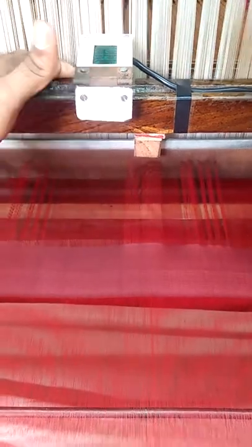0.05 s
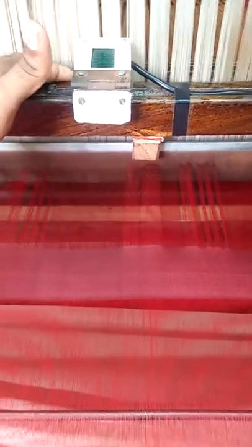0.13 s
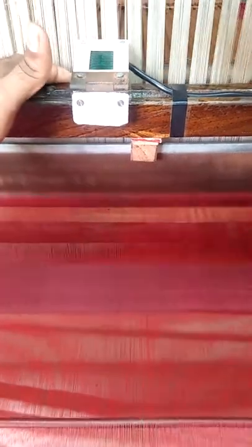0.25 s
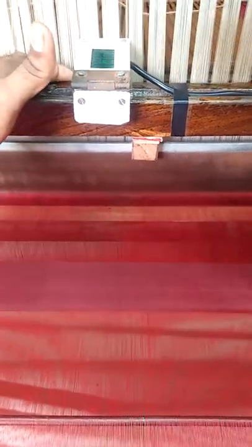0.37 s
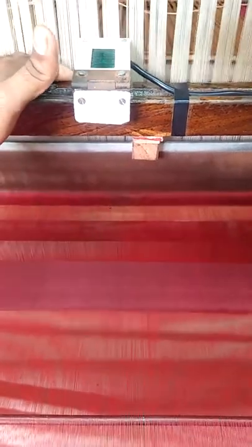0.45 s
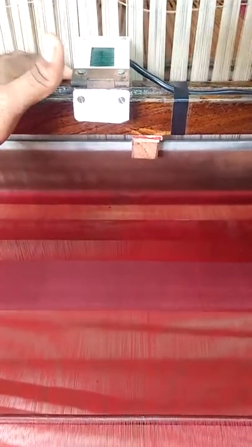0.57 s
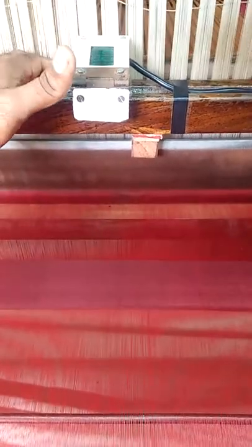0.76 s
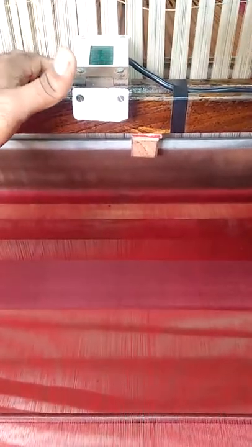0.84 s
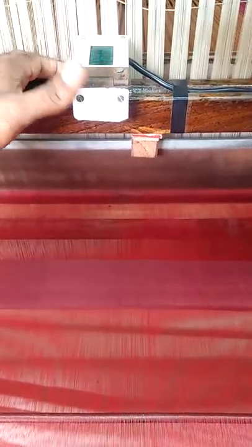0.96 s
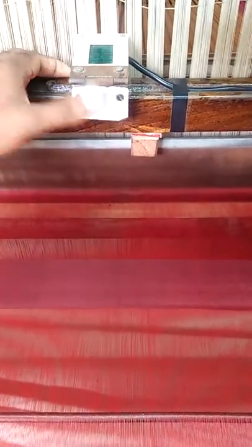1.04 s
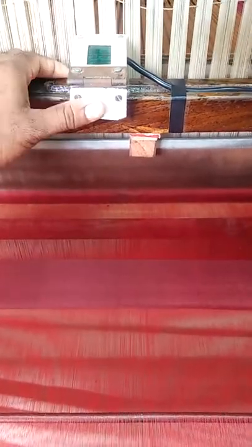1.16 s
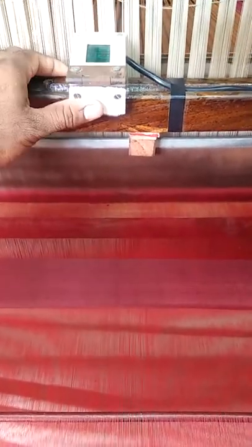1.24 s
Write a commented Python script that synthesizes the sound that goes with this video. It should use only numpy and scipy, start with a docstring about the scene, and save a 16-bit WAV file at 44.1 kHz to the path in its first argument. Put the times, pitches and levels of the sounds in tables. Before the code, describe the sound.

A handloom clatters close by in a quiet room. It opens with a dry wooden knock and a brief groan around 0.2 seconds. Rods, cords and metal heddles rush into a bright, jingling crash at 0.4 seconds, surging again at 0.5 over a low wooden hum. From 0.8 seconds, as this fades, light clicks set metal ringing faintly, with one crisp switch snap near 1.2 seconds.

```python
"""In a quiet room, close to a handloom as it changes shed. A wooden knock and a short groan of the
frame lead into a rush of tiny contacts as cords, rods and metal heddles shift, crash together and
settle. The wooden frame hums and sways, and a few light clicks, as a hand works the switch, set the
metal parts ringing. Rattles are dense trains of impacts coloured by wood or metal; rings are
decaying modes."""
import sys
import numpy as np
from scipy import signal
from scipy.fft import rfft, irfft
from scipy.io import wavfile
from scipy.ndimage import uniform_filter1d

SR = 44100
rng = np.random.default_rng(int(sys.argv[2]) if len(sys.argv) > 2 else 0)


def transcribe(u):
    """Save the signal u as a 16-bit wav file named by the first command-line argument.

    u: samples, shape (n,) or (channels, n), limited to [-1, 1]; the rate is SR.
    q: integer samples, one column per channel.
    """
    v = np.clip(np.atleast_2d(u).T, -1, 1)
    q = np.round(v * 32767).astype(np.int16)
    wavfile.write(sys.argv[1], SR, q)


N = 57330
T = np.arange(N) / SR


def amp(db):
    """Decibels to gain."""
    return 10 ** (np.asarray(db) / 20)


def unit_rms(x):
    """Scales to an rms of one."""
    return x / np.sqrt(np.mean(x ** 2) + 1e-20)


def fader(points):
    """A gain ride through (time [s], level [dB]) points."""
    return amp(np.interp(T, *np.transpose(points)))


def eq(x, curve):
    """Filters by a curve of (frequency [Hz], gain [dB]) points."""
    hz, db = np.transpose(curve)
    bins = np.fft.rfftfreq(2 * N, 1 / SR)
    gain = amp(np.interp(np.log(bins + 1), np.log(hz), db))
    return irfft(rfft(x, 2 * N) * gain)[:N]


def noise(curve):
    """Steady coloured noise."""
    return unit_rms(eq(rng.standard_normal(N), curve))


def wander(samples):
    """Random drift: noise under a moving average."""
    return unit_rms(uniform_filter1d(rng.standard_normal(N), size=samples))


def blow(start, rise, t60):
    """Envelope of a hit: straight attack, exponential decay."""
    age = np.maximum(T - start, 0)
    return np.minimum(age / rise, 1) * amp(-60 * np.maximum(age - rise, 0) / t60)


def swell(start, length):
    """Envelope of a slip: a single arch."""
    return np.sin(np.pi * np.clip((T - start) / length, 0, 1))


def contacts(per_s, spread_db):
    """A dense train of tiny impacts of uneven size."""
    size = amp(spread_db * np.minimum(rng.exponential(1, N), 3))
    return unit_rms(size * rng.choice([-1, 1], N) * (rng.random(N) < per_s / SR))


def rattle(curve, per_s, spread_db):
    """Impacts coloured by the material they strike."""
    return unit_rms(eq(contacts(per_s, spread_db), curve))


def jingle(curve, wires, per_s, spread_db, t60=0.06, share=0.55):
    """Impacts on thin wires, each with its own pitch; share is the ringing part of the power."""
    hits = contacts(per_s, spread_db)
    pitches = 2400 + 12000 * (np.arange(wires) + rng.random(wires)) / wires
    age = T[:N // 3]
    tones = np.sin(2 * np.pi * (pitches[:, None] * age + rng.random((wires, 1))))
    ping = tones.sum(0) * amp(-60 * age / t60)
    ringing = unit_rms(irfft(rfft(hits) * rfft(ping, N), N))
    return unit_rms(eq(np.sqrt(1 - share) * hits + np.sqrt(share) * ringing, curve))


def ring(drive, hz, t60):
    """One resonance, as strong as the signal that drives it."""
    mode = np.sin(2 * np.pi * hz * T) * amp(-60 * T / t60)
    return unit_rms(signal.fftconvolve(drive, mode)[:N]) * np.std(drive)


def strike(start, rise, modes):
    """Modes set ringing by a single blow."""
    return sum(amp(db) * blow(start, rise, t60) * np.sin(2 * np.pi * (hz * T + rng.random()))
               for hz, db, t60 in modes)


# dark room tone (frequency [Hz], gain [dB])
ROOM_EQ = [(30, 3), (600, -5), (2000, -3), (5000, -25), (14000, -44)]

def room_tone():
    """A faint, steady bed of noise."""
    return amp(-77) * noise(ROOM_EQ)


# surges of the swaying loom (time [s], level [dB])
SWAY_RIDE = [(0, -94), (.2, -63), (.45, -51.5), (.55, -62), (.66, -44.5), (.8, -55), (.97, -54),
             (1.1, -62.5), (1.3, -68)]
# their sub-bass weight (frequency [Hz], gain [dB])
SWAY_EQ = [(22, -50), (36, -15), (47, -4), (60, -7), (80, -12.5), (200, -50)]

def sway():
    """The whole loom rocks with a very low rumble."""
    return fader(SWAY_RIDE) * noise(SWAY_EQ)


# travel of the shafts (time [s], level [dB])
SHAFT_RIDE = [(0.02, -74.5), (0.09, -54.5), (0.22, -49), (0.39, -40.5), (0.66, -47.5), (0.76, -59.5),
              (1.0, -67.5), (1.3, -61.5)]
# their dull body (frequency [Hz], gain [dB])
SHAFT_EQ = [(50, -19), (95, -1), (250, -9), (305, 6.5), (370, -12.5), (445, 0.5), (515, -8), (620, 7.5),
            (900, -1), (3000, -57)]

def shafts():
    """The moving shafts rumble with muffled contacts."""
    return fader(SHAFT_RIDE) * rattle(SHAFT_EQ, per_s=3000, spread_db=3.0)


# hard, woody attack (frequency [Hz], gain [dB])
KNOCK_EQ = [(100, -47), (700, -11.5), (1050, 4), (1400, -3), (2100, 3), (2600, -6.5), (5700, -13),
            (6700, -18), (7600, -13), (9800, -16.5), (11500, -25)]
# ring of the knocked wood (frequency [Hz], level [dB], t60 [s])
WOOD_MODES = [(1040, -43, 0.27), (2000, -35, 0.028)]

def knock(start=0.0252):
    """A dry wooden knock with a short diffuse tail."""
    attack = amp(-43) * blow(start, rise=0.0014, t60=0.019)
    tail = amp(-39) * blow(start, rise=0.0017, t60=0.24)
    grain = rattle(KNOCK_EQ, per_s=13000, spread_db=3.5)
    return (attack + tail) * grain + strike(start, rise=0.0017, modes=WOOD_MODES)


# shifting of the wooden rods and cords (time [s], level [dB])
ROD_RIDE = [(0.03, -81), (0.1, -56.5), (0.15, -50.5), (0.24, -50.5), (0.28, -41), (0.35, -41), (0.41, -32),
            (0.49, -33.5), (0.53, -35.5), (0.66, -38), (0.82, -47.5), (0.86, -48.5), (1.0, -59.5),
            (1.3, -54)]
# their midrange clatter (frequency [Hz], gain [dB])
ROD_EQ = [(250, -23.5), (520, -28), (680, -9.5), (900, 2.5), (2100, 2.5), (2700, -8.5), (4000, -7),
          (5000, -9.5), (14000, -20)]

def rods():
    """Rods and cords shift in a rush of small contacts."""
    return fader(ROD_RIDE) * rattle(ROD_EQ, per_s=4000, spread_db=1.0)


# ring of the metal fittings, low to high (frequency [Hz], gain [dB])
METAL_MODES = [(1346, -6), (1561, -5), (1625, -1), (1658, 0), (1914, 0), (1995, -1), (2134, -3), (2239, -7),
               (2870, -8), (3682, -4), (4807, -10), (5416, -9), (6562, -7), (7260, -6), (7940, -4),
               (8565, -3), (9087, -7), (9830, -6), (10665, -2), (12370, -5), (12898, -8), (14130, -8)]

def fittings(friction):
    """The moving rods shake the ten lowest modes of the fittings."""
    shake = amp(-13) * fader(ROD_RIDE) * friction
    return sum(amp(db) * ring(shake, hz, t60=0.27) for hz, db in METAL_MODES[:10])


# build and fall of the heddles' jingle (time [s], level [dB])
HEDDLE_RIDE = [(0.03, -88), (0.1, -59.5), (0.135, -54.5), (0.22, -53.5), (0.3, -48.5), (0.36, -43),
               (0.41, -31), (0.505, -37.5), (0.53, -28.5), (0.59, -31.5), (0.69, -34), (0.81, -46),
               (0.92, -60.5), (1.3, -54)]
# its bright top end (frequency [Hz], gain [dB])
HEDDLE_EQ = [(800, -29), (3000, -6), (4200, -11.5), (5200, -7.5), (6500, -0.5), (7800, 8), (9300, -1.5),
             (10800, -2), (12000, -8.5), (14200, -6.5)]

def heddles():
    """Thin metal heddles jostle and jingle."""
    return fader(HEDDLE_RIDE) * jingle(HEDDLE_EQ, wires=70, per_s=2500, spread_db=7.5)


# high resonances of the heddles (frequency [Hz], gain [dB])
SHIMMER_MODES = [(5962, -16), (7690, -13), (8560, -16), (9263, -16), (14100, -18)]

def heddle_shimmer(friction):
    """Rubbing excites short resonances that ride on the jingle."""
    drive = fader(HEDDLE_RIDE) * friction
    return sum(amp(db) * ring(drive, hz, t60=0.023) for hz, db in SHIMMER_MODES)


def cord_scrape(friction):
    """A cord scrapes briefly through one damped resonance."""
    return ring(amp(-55.5) * swell(start=0.098, length=0.091) * friction, hz=4350, t60=0.0092)


# bumps of the frame (time [s], level [dB])
FRAME_BUMPS = [(0.118, -50), (0.379, -40), (0.568, -37.5), (0.663, -49), (1.037, -47), (1.159, -54)]
# its body resonances (frequency [Hz], gain [dB], t60 [s])
HUM_MODES = [(303, -2, 0.47), (461.3, -6.5, 0.28), (610, -8, 0.46)]

def frame_hum(roughness=0.34):
    """The wooden frame hums after each bump, each mode wavering by itself."""
    hum = np.zeros(N)
    for hz, mode_db, t60 in HUM_MODES:
        envelope = sum(amp(db + mode_db) * blow(start, rise=0.017, t60=t60) for start, db in FRAME_BUMPS)
        phase = 2 * np.pi * hz * T + roughness * wander(samples=500)
        flutter = 1 + roughness * wander(samples=350)
        hum += envelope * flutter * np.sin(phase)
    return hum


# slips of the joints (time [s], length [s], pitch [Hz], level [dB])
JOINT_SLIPS = [(0.169, 0.066, 462.5, -47), (0.207, 0.024, 605, -34), (0.229, 0.032, 648, -29.5),
               (0.25, 0.069, 646, -36.5), (0.646, 0.016, 4170, -35)]

def groans(wobble=0.0224):
    """Joints slip in short, unsteady tones: low groans and one thin squeak."""
    out = np.zeros(N)
    for start, length, hz, db in JOINT_SLIPS:
        pitch = hz * (1 + wobble * wander(samples=300))
        out += amp(db) * swell(start, length) * np.sin(2 * np.pi * np.cumsum(pitch) / SR)
    return out


# clear ring of one rod (frequency [Hz], level [dB], t60 [s])
ROD_MODES = [(1658, -42, 0.45), (2239, -39, 0.36), (3844, -44.5, 0.3), (4247, -53, 0.3)]

def rod_clink():
    """One rod is struck and rings as the lift begins."""
    return strike(start=0.247, rise=0.0065, modes=ROD_MODES)


# rod-on-rod accents (time [s], level [dB], pitch [Hz])
ROD_HITS = [(0.397, -29.5, 2060), (0.519, -31, 2020), (0.841, -46.5, 1110)]

def rod_knocks(friction):
    """Rods knock together: bursts of contacts, each through a damped resonance."""
    return sum(ring(amp(db) * blow(start, rise=0.0019, t60=0.081) * friction, hz, t60=0.0092)
               for start, db, hz in ROD_HITS)


# full-range crash of rods and heddles (frequency [Hz], gain [dB])
CRASH_EQ = [(200, -13), (600, -2), (1400, 4.5), (2300, 5), (2700, 0.5), (4700, -5), (6000, -1), (7600, 2.5),
            (10000, 0.5), (14200, -4)]
# thinner, brighter rebound (frequency [Hz], gain [dB])
REBOUND_EQ = [(1200, -4), (2050, 7), (3000, -23), (6500, -12), (7700, 0.5), (9500, -0.5), (14000, 0)]

def crash():
    """Rods and heddles collide at the end of the lift, and the heddles rebound in a second surge."""
    impact = jingle(CRASH_EQ, wires=40, per_s=3000, spread_db=2.0)
    impact *= amp(-20) * blow(start=0.417, rise=0.013, t60=0.47)
    rebound = jingle(REBOUND_EQ, wires=40, per_s=3000, spread_db=2.0)
    rebound *= amp(-25) * blow(start=0.497, rise=0.04, t60=0.47)
    return impact + rebound


# slides of the heddles (time [s], length [s], level [dB])
HEDDLE_SLIDES = [(0.506, 0.021, -33.5), (0.566, 0.062, -29.5)]

def heddle_sing(friction):
    """Sliding heddles sing briefly on one high note."""
    return sum(ring(amp(db) * swell(start, length) * friction, hz=7872, t60=0.09)
               for start, length, db in HEDDLE_SLIDES)


# light clicks (time [s], rattle level [dB], ring level [dB], ring tilt [dB/octave])
CLICK_CUES = [(0.836, -42, -48, 1.5), (0.93, -43, -58.5, -1.5), (1.0116, -48, -50.5, 3),
              (1.044, -48.5, -55, -3), (1.087, -48.5, -60, 2), (1.179, -48.5, -50, 3),
              (1.208, -46, -53.5, -0.5), (1.269, -67, -52.5, 2)]
# metallic edge of their rattle (frequency [Hz], gain [dB])
CLICK_EQ = [(1000, -15.5), (1900, 12), (2600, -5.5), (4500, -8.5), (6200, -2.5), (7700, 3.5), (9300, -1),
            (11200, -7.5), (14200, -9)]

def clicks():
    """Each click is a dying jingle and the ring of the fittings, whose high modes speak and fade first."""
    envelope = sum(amp(db) * blow(start, rise=0.00061, t60=0.35) for start, db, _, _ in CLICK_CUES)
    out = envelope * jingle(CLICK_EQ, wires=48, per_s=5500, spread_db=0.5, t60=0.22, share=0.7)
    for start, _, ring_db, tilt in CLICK_CUES:
        for hz, db in METAL_MODES:
            mode_db = ring_db + db + tilt * np.log2(hz / 4000) + 2 * rng.standard_normal()
            rise = 0.0065 * 2000 / hz
            t60 = 0.27 * (3000 / hz) ** 0.25
            out += strike(start, rise, [(hz, mode_db, t60)])
    return out


# crisp tick of the switch (frequency [Hz], gain [dB])
SNAP_EQ = [(2000, -35), (7600, -5), (8700, 20), (10000, -28), (12500, -13), (14200, -1)]

def switch_snap():
    """The switch snaps once in a sharp burst of treble."""
    return amp(-32) * blow(start=1.1773, rise=0.00061, t60=0.029) * noise(SNAP_EQ)


def shed_change():
    """The moving parts together; one train of contacts drives all the rubbed resonances."""
    clatter = rods() + shafts() + heddles()
    friction = contacts(per_s=2600, spread_db=0.5)
    metal = fittings(friction) + heddle_shimmer(friction) + heddle_sing(friction)
    accents = cord_scrape(friction) + rod_knocks(friction) + crash() + rod_clink()
    return clatter + metal + accents


# stereo spread of the moving parts (frequency [Hz], side gain [dB])
SIDE_EQ = [(3200, -65), (4400, -22), (5500, -14), (8000, -7), (14000, -5.5)]

def scene():
    """The loom is central; only the treble of its many small parts spreads to the sides."""
    mid = room_tone() + knock() + shed_change() + clicks() + switch_snap()
    mid += frame_hum() + sway() + groans()
    side = eq(shed_change(), SIDE_EQ)
    return np.array([mid + side, mid - side])


def record(dry):
    """A steep low-pass trims the very top."""
    lowpass = signal.firwin(801, cutoff=14270, window=("kaiser", 8), fs=SR)
    return signal.oaconvolve(dry, lowpass[None], "same")


dry = scene()
out = record(dry)
transcribe(out)
```